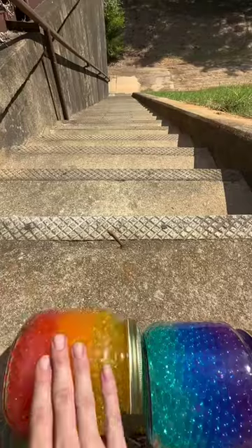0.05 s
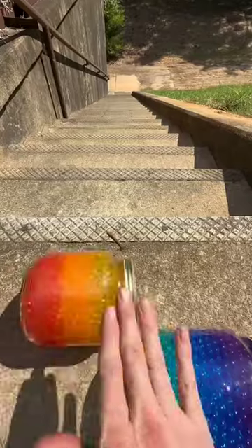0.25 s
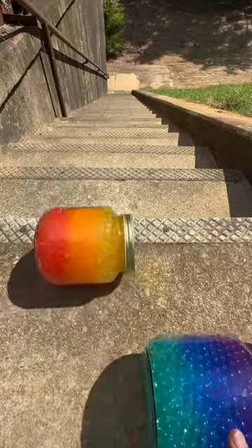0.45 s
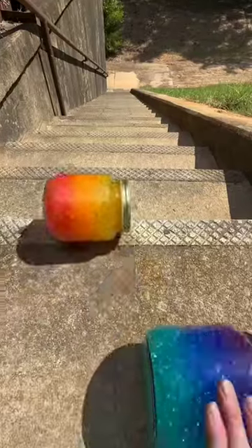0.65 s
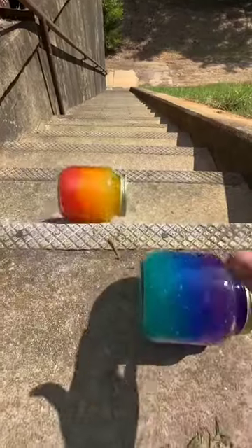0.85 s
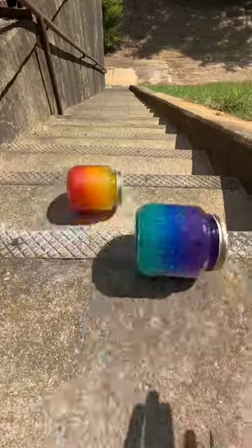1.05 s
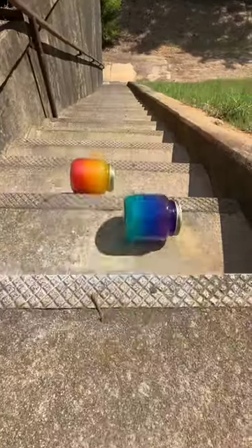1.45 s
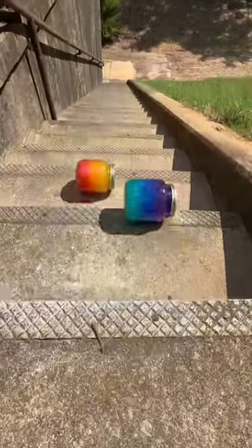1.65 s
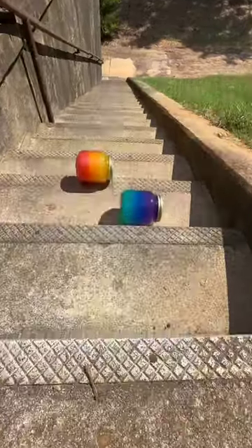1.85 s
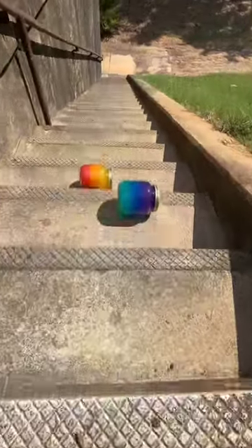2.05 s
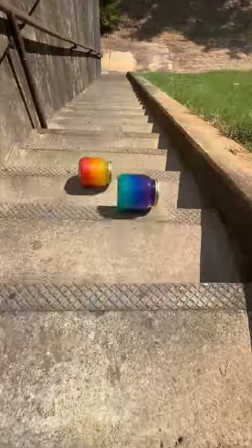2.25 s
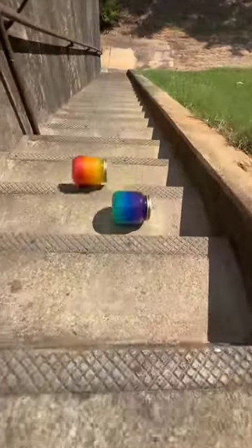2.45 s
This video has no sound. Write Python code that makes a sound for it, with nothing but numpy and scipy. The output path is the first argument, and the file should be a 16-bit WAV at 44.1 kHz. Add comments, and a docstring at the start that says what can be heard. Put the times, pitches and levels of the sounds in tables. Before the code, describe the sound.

Two filled glass jars roll over rough concrete and thud down outdoor steps.

```python
"""Glass jars rolling down steps

Two filled jars are pushed off a concrete landing and roll down outdoor steps. They bump dully over
the rough concrete and crush grit that makes the glass tick. Each drop to the next step is a loud,
quickly damped knock, echoed by the steps and the side wall. Far off something rasps, perhaps a crow."""
import sys
import numpy as np
from scipy import signal
from scipy.fft import rfft, irfft
from scipy.io import wavfile

SR = 44100
rng = np.random.default_rng(int(sys.argv[2]) if len(sys.argv) > 2 else 0)


def transcribe(signal):
    """Save signal, clipped to [-1, 1], as a 16-bit WAV file at the path in sys.argv[1]."""
    frames = np.atleast_2d(signal).T
    limited = np.clip(frames, -1, 1)
    pcm = np.round(limited * 32767).astype(np.int16)
    wavfile.write(sys.argv[1], SR, pcm)


N = 110250
TIME = np.arange(N) / SR

# Levels in the tables are faders, set ahead of each layer's own trims.
# Drops onto a step: (time [s], push [dB], thud [dB], thud pitch [Hz], hollow clunk [dB], crack [dB],
# low glass [dB], high glass [dB], grit [dB])
LANDINGS = [(1.0780, 8.5, 0, 772, -17, -41, -4, -14, -23.5),
            (1.4984, -20, 2.5, 848, -11, -8.5, -45, -15.5, -16.5),
            (1.666, -1, -2.5, 774, -14, -24, -15, -17.5, -18.5),
            (2.0230, 1.5, -1, 803, -9.5, -9.5, -18, -12.5, -16),
            (2.2206, 0.5, -6, 783, -42, -16, -23.5, -17, -19.5)]
# Rolling contact with the concrete: (time [s], rumble [dB], glass chatter [dB], grit hiss [dB])
ROLL_LEVELS = [(0.179, -99, -105, -110), (0.197, -57, -97, -100), (0.222, -43, -37, -80),
               (0.248, -23, -36.5, -91), (.32, -24.5, -50.5, -47), (0.404, -26.5, -41.5, -46),
               (.445, -27.5, -47.5, -45), (0.531, -23, -38.5, -49.5), (0.659, -35.5, -46, -37),
               (.72, -33, -35.5, -59), (0.789, -36, -49, -48), (0.838, -23, -36, -55),
               (.89, -23, -35.5, -40), (.915, -24.5, -34, -37), (.95, -22.5, -31, -32.5),
               (1.06, -29.5, -34.5, -44.5), (1.132, -41, -39.5, -44), (1.18, -29.5, -31, -31.5),
               (1.259, -26.5, -35, -38.5), (1.33, -37.5, -37, -49), (1.43, -42, -48.5, -53.5),
               (1.49, -33.5, -36.5, -47), (1.536, -35, -35, -45), (1.558, -56, -89, -63),
               (1.588, -33, -31.5, -37), (1.688, -36, -64, -34.5), (1.741, -39, -43, -44.5),
               (1.80, -36.5, -37.5, -45), (1.86, -54, -41, -40.5), (1.90, -43, -48.5, -56),
               (1.975, -54.5, -49.5, -60), (2.017, -37.5, -39.5, -65), (2.078, -62, -71, -57),
               (2.118, -39, -33.5, -32), (2.168, -44.5, -51, -52), (2.233, -20.5, -31, -43.5),
               (2.278, -45.5, -57, -41), (2.319, -34, -43, -41.5), (2.37, -36, -36, -46),
               (2.405, -46, -49, -47.5), (2.442, -30, -47.5, -58), (2.5, -58.5, -45, -58)]
# Knocks over ridges: (time [s], level [dB])
BUMPS = [(0.2241, -8), (0.2461, -8), (0.2496, -9), (0.3002, -10), (0.3193, -4.5), (.3285, -4.5),
         (0.3412, -31), (0.349, -14), (0.3585, -5), (0.3626, -8), (0.4667, -4), (0.4719, -8),
         (0.5058, -7.5), (0.5104, -8.5), (0.5314, -11.5), (0.5695, -12), (0.635, -16), (0.69, -11.5),
         (0.8284, -16), (0.836, -5.5), (0.8433, -35), (.8668, -23), (0.8804, -8), (0.8855, -3),
         (.8906, -34), (0.9266, -10), (0.932, -11), (0.9383, -21), (0.9843, -10.5), (1.0656, -7.5),
         (1.5146, -9.5), (1.581, -13), (1.751, -22), (2.3073, -28), (2.328, -21), (2.424, -23.5),
         (2.454, -28)]
# Grains cracking under the glass: (time [s], ring [dB], grit [dB], ring tilt [dB/octave])
TICKS = [(.2735, -24, -70, -13.5), (0.2822, -19, -60, 2.5), (.304, -17.5, -34, -4), (0.326, -24, -28, -11),
         (0.3675, -25.5, -24.5, -9), (0.4242, -37, -26, -11), (0.466, -26.5, -33, -7),
         (0.514, -17, -22, -5), (.556, -25.5, -87, 7), (.575, -27, -28.5, 8), (0.6353, -27.5, -23, 17),
         (0.653, -41, -25.5, 2), (0.692, -23, -33, -9), (.6987, -16.5, -19, 1), (0.77, -25.5, -35, 1.5),
         (0.803, -8, -15.5, -4), (0.8368, -33, -28.5, 27), (0.8676, -10, -31, -8), (0.9029, -20, -19.5, -6),
         (0.905, -25.5, -24.5, 27), (0.9394, -26, -22.5, 26), (0.9978, -21, -24, 0), (1.005, -17, -24, -11),
         (1.0349, -13, -15, 6), (1.1326, -14, -20.5, 2), (1.1624, -18, -17.5, 7),
         (1.3857, -28.5, -31.5, -28), (1.6181, -30, -21.5, 22), (1.64, -22.5, -52, -1),
         (1.658, -20, -29, 2), (1.6927, -18, -33, 2), (1.7529, -24, -23.5, -24), (1.775, -18, -22, -7),
         (1.821, -25, -52, 6), (1.863, -24.5, -34, -19), (1.9447, -23, -41, -14), (2.06, -12.5, -26, 4.5),
         (2.1063, -20.5, -26.5, 9), (2.111, -25, -42, 0), (2.307, -20.5, -26, 3), (2.3462, -25.5, -33, -15),
         (2.369, -26, -31, -30.5)]
# Thud of a filled jar: (frequency [multiple of the thud pitch], level [dB], t60 [s])
THUD_MODES = [(0.752, -13, 0.06), (1.001, -3, 0.037), (1.13, -6.5, .03), (1.308, -4.5, 0.016),
              (1.62, -15, 0.046)]
# Hollow resonances of a rolling jar: (frequency [Hz], level [dB], t60 [s])
HOLLOW_MODES = [(286.4, -18, 0.18), (391, -7.5, 0.029), (581, -11, 0.047), (693.6, -8.5, .08),
                (818, -8, 0.054)]
# The first jar's glass wall, damped by the filling: (frequency [Hz], level [dB], t60 [s])
FIRST_JAR_MODES = [(2274, -5, 0.03), (2650, -5.5, 0.0052), (3316, -2, 0.03), (3854, -3, 0.024),
                   (4560, -2.5, 0.037), (5360, -5, 0.016), (5916, -2, 0.021), (6400, -6.5, 0.026)]
# The second jar's glass wall: (frequency [Hz], level [dB], t60 [s])
SECOND_JAR_MODES = [(2170, 2, 0.031), (2380, -9, 0.022), (2795, -0.5, 0.016), (3260, -9, 0.018),
                    (3658, 2, 0.015), (3934, 0.5, 0.021), (4690, -3, 0.03), (5000, -13, 0.017),
                    (5270, -7, 0.014), (5520, -4.5, 0.028), (6170, -2, 0.014)]
# Tone of crushed grit: (frequency [Hz], level [dB])
GRIT_EQ = [(300, -10), (1700, -9.5), (2600, 4), (4200, 1.5), (6300, -1.5), (7600, -3.5), (9500, -2.5),
           (11300, -2), (13000, 3), (15500, 1.5)]
# Reflections off the steps and side wall: (delay [s], level [dB])
ECHOES = [(.0043, -26), (.0078, -23), (0.0175, -31.5)]
# Distant calls: (start [s], length [s], band centre [Hz], level [dB])
CAWS = [(0.705, 0.077, 1185, -31), (1.914, 0.1, 1420, -40.5)]

SECOND_JAR_FROM_S = 0.79   # ticks and chatter pass to the second jar here
LOW_GLASS_BELOW_HZ = 3000   # glass modes below this have their own fader
CRUSH_LEAD_S = (SR // 200) / SR   # a crumble starts this long before its click


def landings(ring_db=-2):
    """A jar hits a step: a hard push, a damped thud and clunk, a crack, ringing glass, a spray of grit."""
    times, push_db, thud_db, pitch, clunk_db, crack_db, low_db, high_db, spray_db = np.transpose(LANDINGS)
    blows = place(times, from_db(push_db))
    contacts = crushes(len(times), decay_s=0.0031, click=0.71, lead=0.35)
    push = from_db(-6.5) * soft_contact(blows, low_hz=318, high_hz=1466)
    ground = from_db(-41.5) * soft_contact(blows, low_hz=25.5, high_hz=173)
    thud = ring(place(times, from_db(clunk_db)), hz=433, t60=0.051)   # the hollow clunk
    for at, level, hz in zip(times, thud_db, pitch):
        for ratio, mode_db, t60 in THUD_MODES:
            thud += ring(place([at], [from_db(level + mode_db)]), ratio * hz, t60)
    thud = cut(cut(thud, hz=2040, kind="low"), hz=270, kind="high")
    crack_noise = rms_one(cut(rng.standard_normal(N), hz=[1080, 3080], kind="band"))
    crack = bursts(times, crack_db, decay_s=0.0034) * crack_noise
    wall = 0
    for k, (hz, mode_db, t60) in enumerate(SECOND_JAR_MODES):
        level = ring_db + mode_db + (low_db if hz < LOW_GLASS_BELOW_HZ else high_db)
        wall += (-1) ** k * glass(strike(times, level, contacts), hz, t60)
    spray = bursts(times, spray_db, decay_s=0.011) * grit(per_s=10000, spread_db=2.5)
    return push + ground - thud + crack + wall + spray


def rolling():
    """Rough concrete shakes the jars: a hollow rumble, chatter in the glass and a hiss of grit."""
    times, *faders = np.transpose(ROLL_LEVELS)
    rumble_gain, chatter_gain, hiss_gain = [from_db(np.interp(TIME, times, db)) for db in faders]
    jolts = rms_one(soft_contact(grains(per_s=380, spread_db=1.5), low_hz=260, high_hz=1127))
    body = jolts + sum(from_db(db) * rms_one(ring(jolts, hz, t60) * flicker(per_s=18, spread_db=8))
                       for hz, db, t60 in HOLLOW_MODES)
    # The rumble thins out as the jars roll away.
    away = np.interp(TIME, [1.25, 2.1], [0, 1])
    near = rms_one(cut(body, hz=171, kind="high", order=3))
    far = rms_one(cut(body, hz=298, kind="high", order=4))
    rumble = np.sqrt(1 - away) * near + np.sqrt(away) * far
    wall = np.where(TIME < SECOND_JAR_FROM_S,
                    chatter(FIRST_JAR_MODES, low_db=4), chatter(SECOND_JAR_MODES, low_db=-8.5))
    hiss = flicker(per_s=110, spread_db=1) * grit(per_s=7200, spread_db=0.5)
    return rumble_gain * rumble + chatter_gain * wall + hiss_gain * hiss


def bumps(hollow_db=-19):
    """Larger ridges give single dull knocks; each rings the hollow resonances in a new balance."""
    times, db = np.transpose(BUMPS)
    scatter_db = 3 * rng.standard_normal((len(times), len(HOLLOW_MODES)))
    hollow = 0
    for k, (hz, mode_db, t60) in enumerate(HOLLOW_MODES):
        level = db + hollow_db + mode_db + scatter_db[:, k]
        hollow += (-1) ** k * ring(place(times, from_db(level)), hz, t60)
    knocks = soft_contact(place(times, from_db(db)), low_hz=333, high_hz=1019)
    return knocks + cut(hollow, hz=[220, 1100], kind="band")


def ticks(rows, modes, low_db, ring_db, grit_db):
    """A grain cracks under a jar: a puff of grit and a brief glassy ring."""
    times, db, spray_db, tilt = np.transpose(rows)
    contacts = crushes(len(times), decay_s=0.007, click=0.56, lead=0.27)
    scatter_db = 2.5 * rng.standard_normal((len(times), len(modes)))
    spray = bursts(times, spray_db + grit_db, decay_s=0.0071) * grit(per_s=4300, spread_db=3)
    wall = 0
    for k, (hz, mode_db, t60) in enumerate(modes):
        tone_db = tilt * np.log2(hz / 4200) + low_db * (hz < LOW_GLASS_BELOW_HZ)
        level = db + ring_db + mode_db + tone_db + scatter_db[:, k]
        wall += (-1) ** k * glass(strike(times, level, contacts), hz, t60)
    return spray + wall


def chatter(modes, low_db):
    """Sand under a jar keeps its glass ringing."""
    sand = grains(per_s=2500, spread_db=4.5) * flicker(per_s=90, spread_db=5.5)
    wall = 0
    for k, (hz, mode_db, t60) in enumerate(modes):
        level = mode_db + low_db * (hz < LOW_GLASS_BELOW_HZ)
        wall += (-1) ** k * from_db(level) * glass(sand, hz, t60)
    return rms_one(wall)


def glass(x, hz, t60):
    """One mode of a jar's wall: a quickly damped ring and a faint longer one."""
    return ring(x, hz, t60) + from_db(-42) * ring(x, hz, t60=0.08)


def grit(per_s, spread_db):
    """Bright crackle of crushed grit; each band flickers by itself, so every crunch has its own colour."""
    hz, db = np.transpose(GRIT_EQ)
    bins = np.fft.rfftfreq(N, 1 / SR)
    eq = from_db(np.interp(np.log(bins + 1), np.log(hz), db))
    spectrum = rfft(grains(per_s, spread_db)) * eq
    centres_hz, step_hz = np.linspace(0, 17000, 34, retstep=True)
    crackle = 0
    for centre in centres_hz:
        band = np.maximum(1 - np.abs(bins - centre) / step_hz, 0)
        crackle += irfft(spectrum * band, N) * flicker(per_s=35, spread_db=6)
    return rms_one(crackle)


def nudge():
    """The hand sets the first jar humming softly."""
    touch = place(times=[0.191], gains=[from_db(-31)])
    return cut(ring(touch, hz=301.6, t60=0.6), hz=[200, 600], kind="band")


def stairway(x, tail_db=-29, tail_t60=0.16):
    """The steps and side wall add tight echoes and a weak outdoor tail."""
    delays, db = np.transpose(ECHOES)
    tail = cut(rng.standard_normal(N), hz=7000, kind="low")
    tail *= from_db(-60 * TIME / tail_t60) * (TIME > delays[0])
    response = place(delays, from_db(db)) + from_db(tail_db) * tail / np.linalg.norm(tail)
    return x + signal.fftconvolve(x, response)[:N]


def caws():
    """Perhaps a far crow: an uneven rasp through one throat resonance, swelling and fading."""
    out = 0
    for start, length, hz, db in CAWS:
        rasp = rng.standard_normal(N) * flicker(per_s=180, spread_db=3.5)
        throat = rms_one(cut(rasp, hz * np.exp([-0.15, 0.15]), "band"))
        swell = np.sin(np.pi * np.clip((TIME - start) / length, 0, 1))
        out += from_db(db) * swell * throat
    return out


def air(level_db=-61, start_s=0.17, fade_s=0.036):
    """A faint bed of low outdoor rumble, fading in."""
    noise = cut(cut(rng.standard_normal(N), hz=130, kind="low"), hz=35, kind="high")
    return from_db(level_db) * rms_one(noise) * np.clip((TIME - start_s) / fade_s, 0, 1)


def soft_contact(clicks, low_hz, high_hz):
    """Each unit click becomes one dull swing of height 1."""
    swing = cut(cut(signal.unit_impulse(2048), high_hz, "low", order=8), low_hz, "high")
    return -signal.fftconvolve(clicks, swing / np.abs(swing).max())[:N]


def crushes(count, decay_s, click, lead):
    """Gritty contacts: a click inside a crumble whose rise time is lead times its decay time."""
    t = TIME[:SR // 20] - CRUSH_LEAD_S
    envelope = np.exp(-np.abs(t) / decay_s / np.where(t < 0, lead, 1))
    crumble = rng.standard_normal((count, len(t))) * envelope
    return click * (t == 0) + 0.9 * crumble / np.linalg.norm(crumble, axis=1, keepdims=True)


def strike(times, db, contacts):
    """Lay the contacts so that their clicks fall on the given times."""
    return place(times - CRUSH_LEAD_S, from_db(db), contacts)


def bursts(times, db, decay_s, rise_s=0.0019, lead_s=0.0018):
    """An envelope with a quick attack and short decay at each contact."""
    t = TIME[:SR // 8]
    shape = (1 - np.exp(-t / rise_s)) * np.exp(-t / decay_s)
    return signal.fftconvolve(place(times - lead_s, from_db(db)), shape)[:N]


def grains(per_s, spread_db):
    """Random clicks of uneven size."""
    clicks = (rng.random(N) < per_s / SR) * rng.choice([-1, 1], N)
    return clicks * from_db(spread_db * np.minimum(rng.exponential(1, N), 4))


def flicker(per_s, spread_db):
    """A gain that glides to a new random value per_s times a second."""
    return from_db(spread_db * np.interp(TIME * per_s, np.arange(2000), rng.standard_normal(2000)))


def place(times, gains, shapes=None):
    """A click, or one short shape each, at the given times."""
    if shapes is None:
        shapes = np.ones((len(times), 1))
    out = np.zeros(N + SR)
    for at, gain, shape in zip(times, gains, shapes):
        start = int(at * SR)
        out[start:start + len(shape)] += gain * shape
    return out[:N]


def ring(x, hz, t60):
    """A resonator: a unit click starts a decaying sine of height 1."""
    decay, angle = from_db(-60 / (t60 * SR)), 2 * np.pi * hz / SR
    return signal.lfilter([0, np.sin(angle)], [1, -2 * decay * np.cos(angle), decay ** 2], x + 1e-18)


def cut(x, hz, kind, order=2):
    """Butterworth low-, high- or band-pass."""
    return signal.sosfilt(signal.butter(order, hz, kind, fs=SR, output="sos"), x + 1e-18)


def rms_one(x):
    """Scale to rms 1."""
    return x / np.sqrt(np.mean(x ** 2) + 1e-20)


def from_db(db):
    """Decibels to gain."""
    return 10 ** (np.asarray(db) / 20)


def scene():
    """The mono mix: jars on the stairway over distant calls and air."""
    first_rows = [row for row in TICKS if row[0] < SECOND_JAR_FROM_S]
    second_rows = [row for row in TICKS if row[0] >= SECOND_JAR_FROM_S]
    first_ticks = ticks(first_rows, FIRST_JAR_MODES, low_db=-2, ring_db=-3, grit_db=1.5)
    second_ticks = ticks(second_rows, SECOND_JAR_MODES, low_db=-27, ring_db=-4, grit_db=0.5)
    jars = nudge() + rolling() + bumps() + first_ticks + second_ticks + landings()
    return (stairway(jars) + caws() + air())[None]


def record(dry, ceiling=0.86, low_cut_hz=55, high_cut_hz=15700):
    """Soft clipping rounds off the loudest knocks; the deep bass and the very top are cut."""
    rounded = cut(ceiling * np.tanh(dry / ceiling), low_cut_hz, "high", order=1)
    return signal.sosfilt(signal.ellip(10, 0.2, 75, high_cut_hz, fs=SR, output="sos"), rounded)


dry = scene()
out = record(dry)
transcribe(out)
```